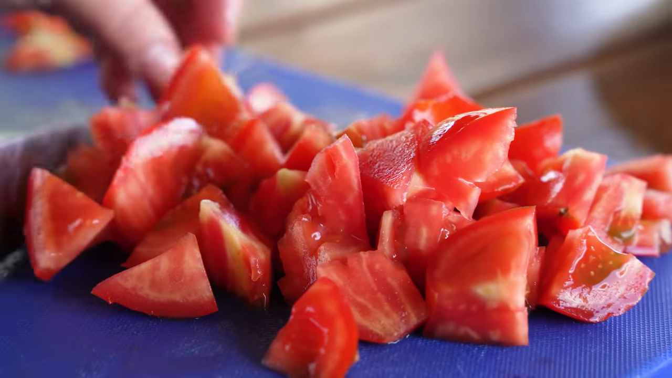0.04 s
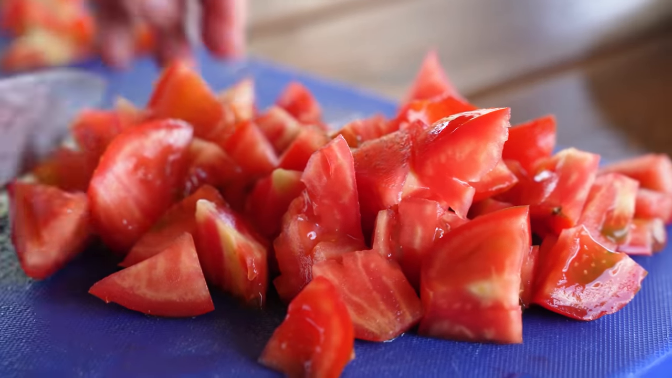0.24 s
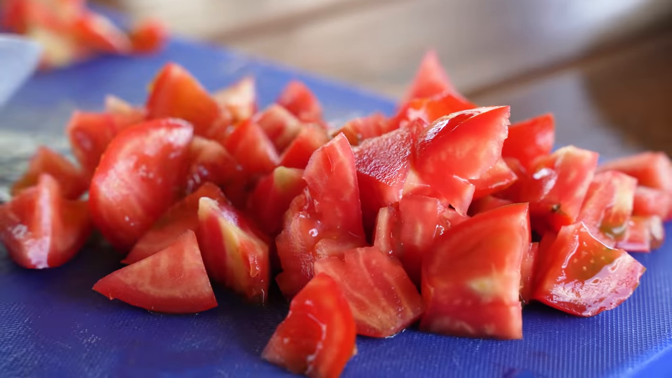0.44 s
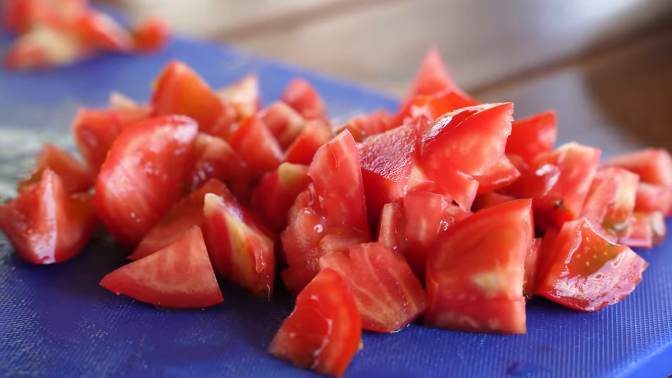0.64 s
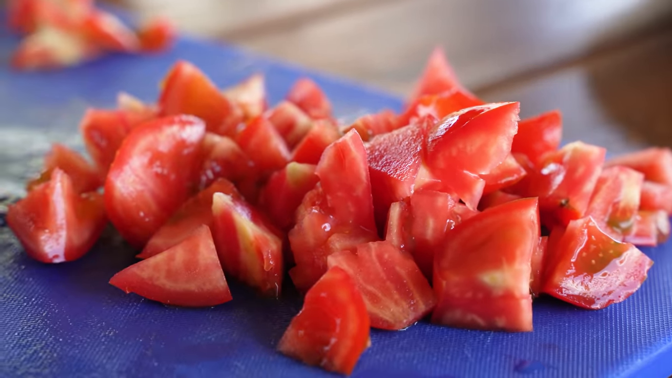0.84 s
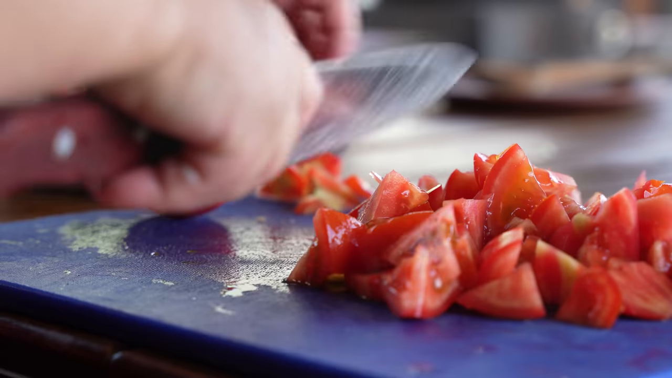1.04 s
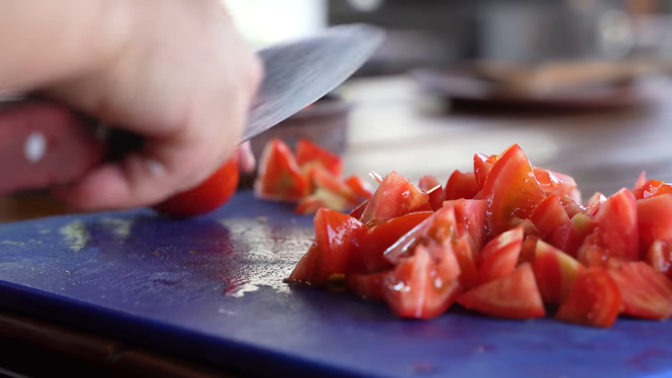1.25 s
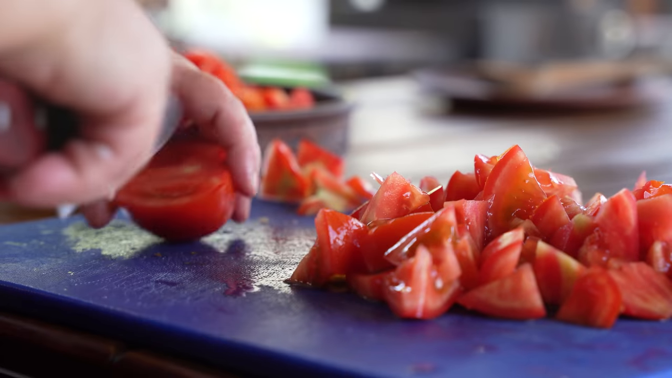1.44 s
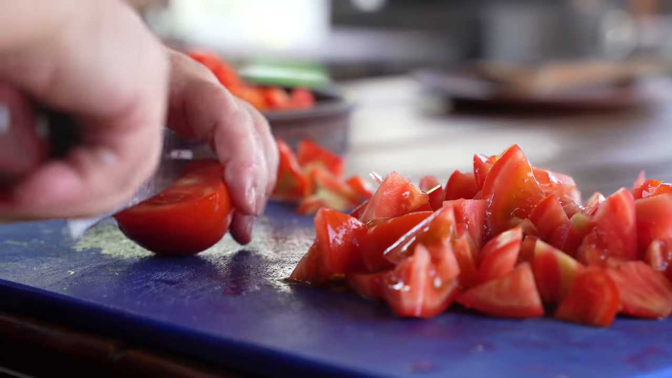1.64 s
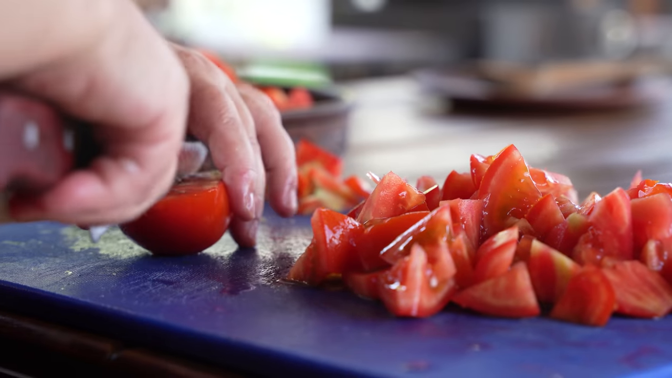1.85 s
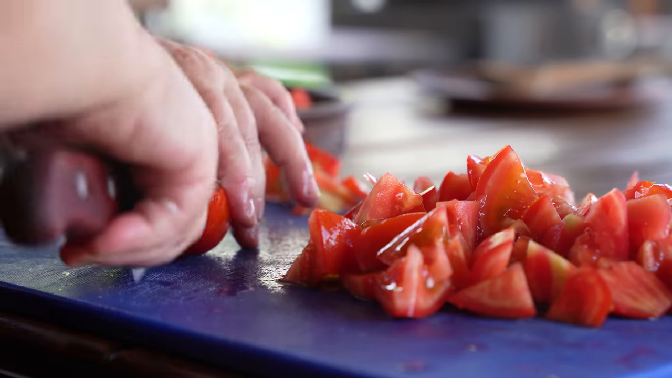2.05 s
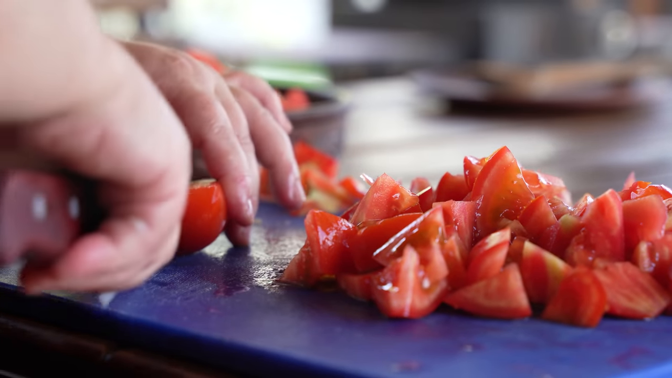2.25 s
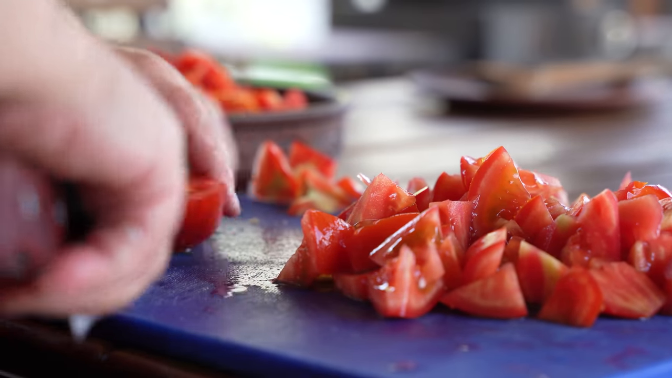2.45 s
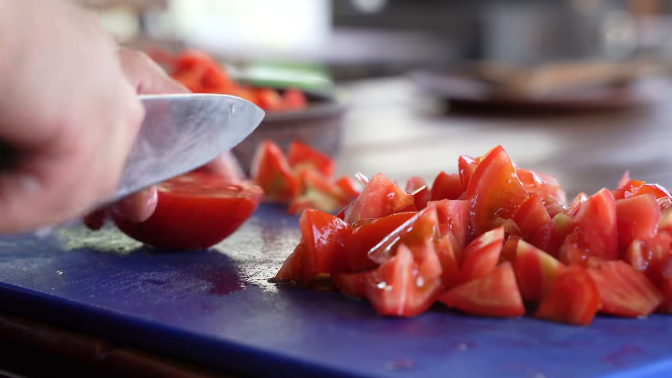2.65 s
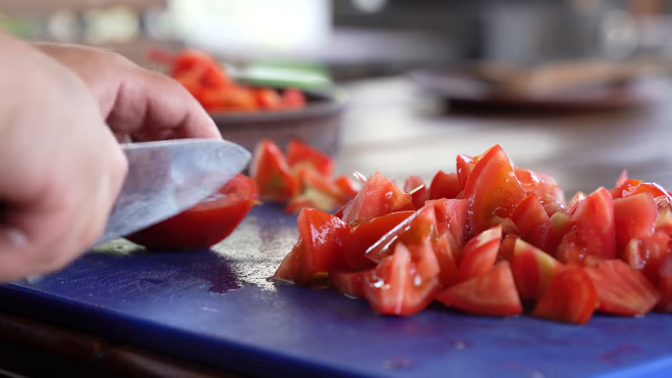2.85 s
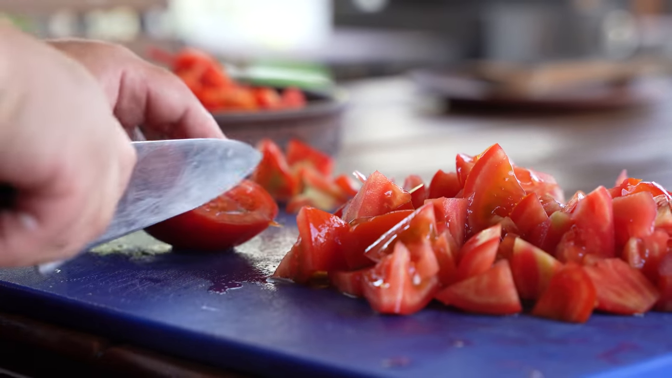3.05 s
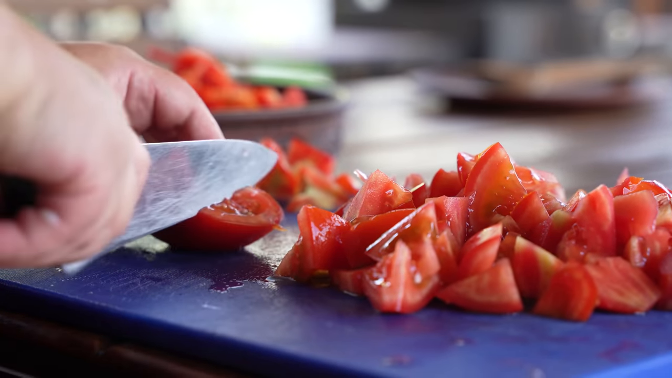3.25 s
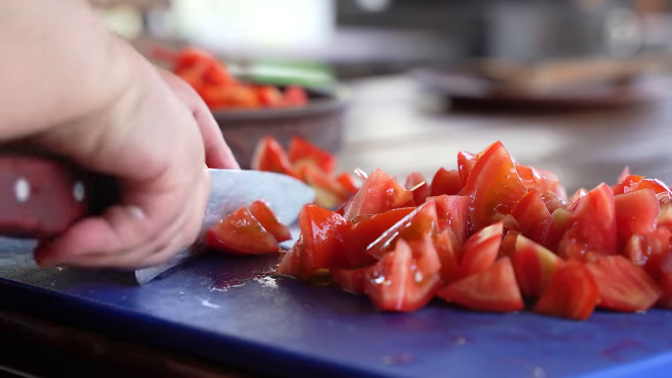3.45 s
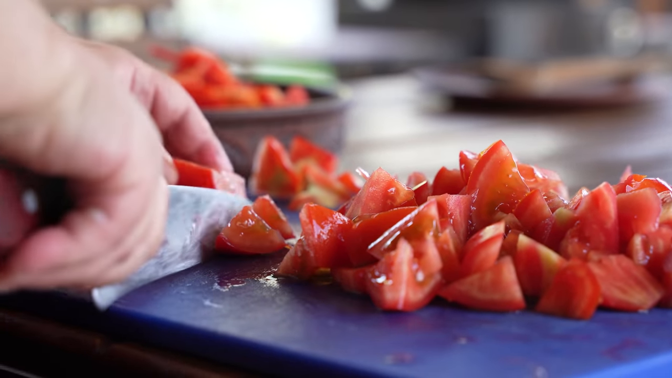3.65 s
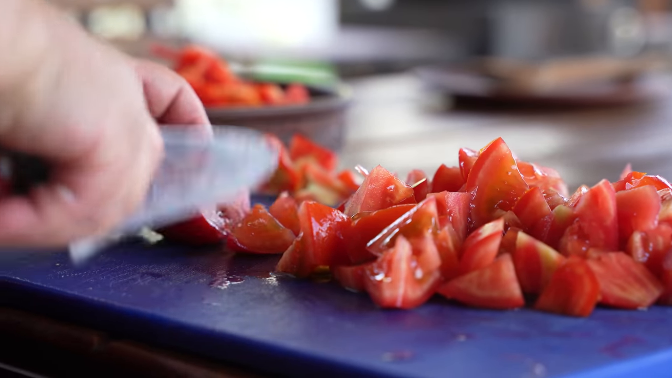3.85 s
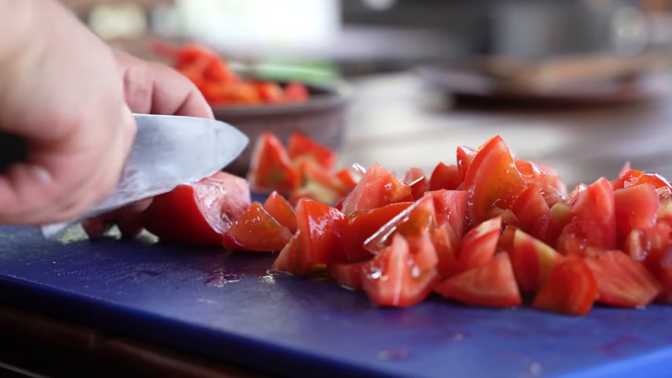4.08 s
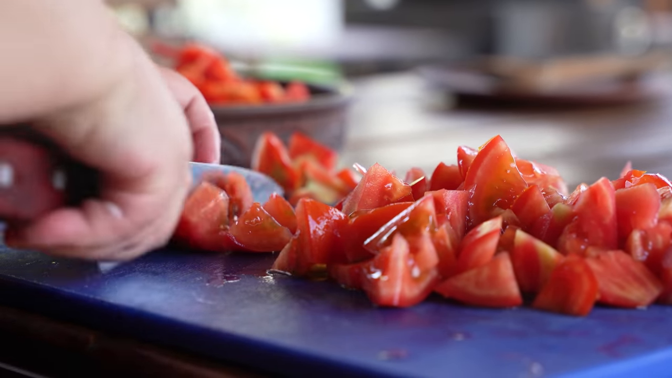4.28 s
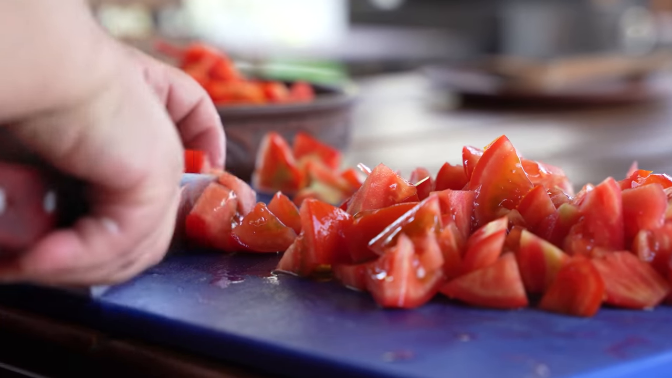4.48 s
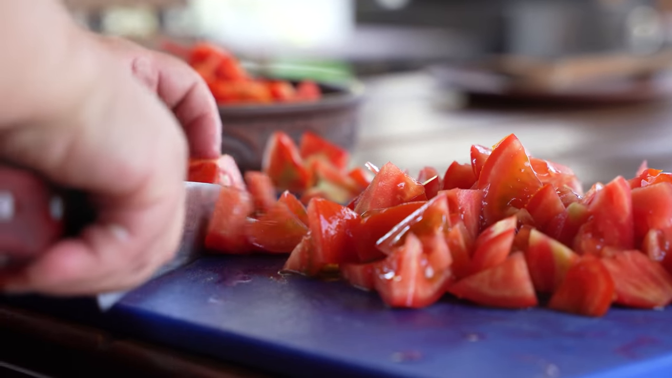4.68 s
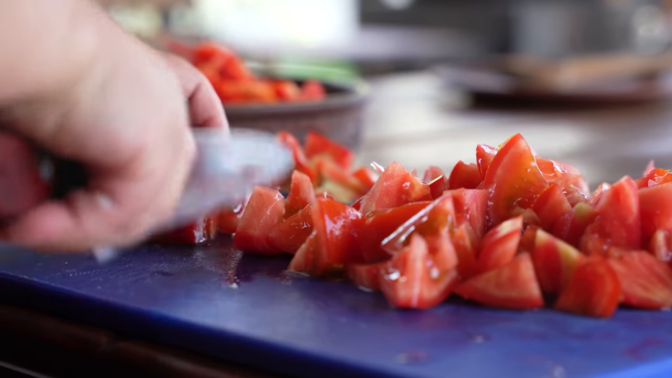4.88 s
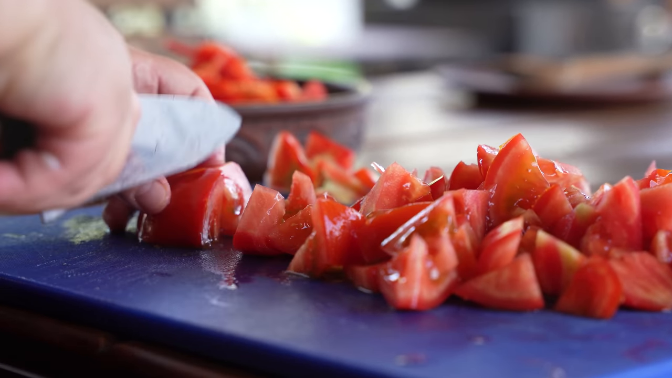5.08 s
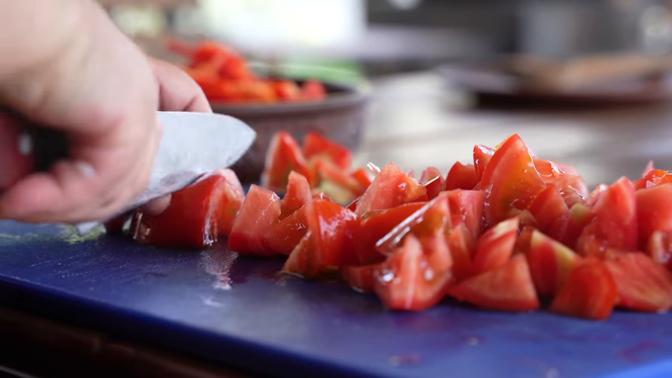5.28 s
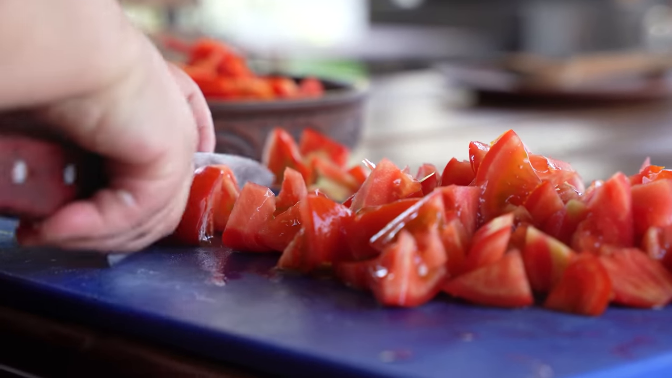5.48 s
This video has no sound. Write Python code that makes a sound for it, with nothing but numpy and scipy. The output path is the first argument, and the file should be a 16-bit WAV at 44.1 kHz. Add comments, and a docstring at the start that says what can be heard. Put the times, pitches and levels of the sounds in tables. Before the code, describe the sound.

A knife rasps through wet flesh and lands on a board with short, dull, woody knocks. An early blow is followed by near quiet; slicing starts around two seconds, then a softer clustered knock, a medium one, a faint stuttering scrape, and a strong final chop. Close mono pickup, small nearby reflections, faint low ambient rush with slight hiss.

```python
"""A chef's knife cuts tomatoes on a plastic board on a wooden table, close to the microphone.
Its edge rasps and fizzes through wet flesh: filtered click trains, with a faint narrow-band singing.
Knocks and judders ring a bank of decaying board modes, with echoes and diffuse noise tails.
Short noise bursts snap, rough gliding tones squeak; a steady rush of shaped noise hums faintly behind."""
import sys
import numpy as np
from scipy import signal
from scipy.fft import rfft, irfft
from scipy.io import wavfile
from scipy.ndimage import uniform_filter1d

SR = 44100
rng = np.random.default_rng(int(sys.argv[2]) if len(sys.argv) > 2 else 0)


def generate_wav(signal):
    """Clip the signal to [-1, 1] and save it as 16-bit WAV at the path in sys.argv[1]."""
    frames = np.transpose(np.atleast_2d(signal))
    scaled = np.clip(frames, -1, 1) * 32767
    pcm = np.round(scaled).astype(np.int16)
    wavfile.write(sys.argv[1], SR, pcm)


N = 243431
TIME = np.arange(N) / SR  # s

# Spectrum of the rush behind, relative: f/Hz, level per Hz/dB
RUSH_SPECTRUM = [(15, -62), (25, -12), (48, -30), (77, -3.5), (113, -11.5), (140, -1.5), (198, -5.5),
                 (221, -4), (340, -1), (537, -6), (945, -0.5), (2420, -15.5), (3930, -18), (5880, -32),
                 (15500, -47.5)]
# Narrow hums and broader bumps (or dips) on that spectrum: f/Hz, width/Hz, boost/dB
RUSH_RESONANCES = [(147.2, 9.6, 7), (197.6, 13.7, 11.5), (330, 15, 5), (980, 270, -1), (3970, 840, 5.5)]
# Moments when the rush hisses more: middle t/s, length/s, extra treble level/dB
HISS_SWELLS = [(.88, 0.45, 4), (1.42, 0.32, 3)]
# Ringing modes of the board on its table, before each blow's pitch factor: f/Hz, level/dB, t60/s
BOARD_MODES = [(89.6, -21, 0.35), (159, -8, 0.079), (232, -9, 0.069), (340.6, 2.5, 0.037),
               (447, 1.5, 0.018), (506, 2.5, 0.041), (576.5, 4, 0.023), (714, -1, 0.037), (782, -8, 0.089),
               (975, -4, 0.031), (1042, 2, 0.039), (1280, -36, .055), (1313, -12.5, 0.042),
               (1746, -11, 0.057), (1846, -9, 0.055), (1944, -8.5, 0.027), (2200, -3, 0.013),
               (2650, -9, 0.02), (2947, -6, 0.019), (3130, -6, 0.0067), (3650, 3, 0.0088)]
# Blows on the board: t/s, level/dB, contact cut-off f/Hz, pitch factor,
# f/Hz favoured by the spot struck, its boost/dB, tail level/dB before the tail's filters, tail t60/s
BLOWS = [(.128, -26.5, 1260, 0.98, 800, 4, -5.5, 0.38), (0.1326, -36, 457, 1.01, 339, 17.5, -10, 0.3),
         (.933, -56.5, 259, 1.1, 181, 24, 5, 0.82), (2.073, -28, 1610, 0.94, 1090, 3, 0, 0.44),
         (3.454, -41.5, 735, 1.01, 250, 10, -5, 0.35), (3.466, -48.5, 2300, 0.94, 1900, 5, 1.5, 0.44),
         (3.4727, -39, 240, 0.99, 106, 19, -2.5, 0.31), (3.4862, -43, 300, 1.49, 230, 12, -7, .2),
         (3.507, -48.5, 320, 1.21, 271, 12, 1, 0.28), (4.344, -35, 1150, 0.98, 457, 5, -3.5, 0.43),
         (4.348, -41, 130, 1.08, 85, 16, -13, 0.5), (4.7661, -47.5, 260, 1, 182, 14.5, -10, .3),
         (4.8045, -44, 420, 1.16, 200, 1, -15, .3), (5.4655, -26.5, 1820, 1.02, 445, 3, 0, 0.46)]
# First echoes from the table top, bowl and hand: delay/s, level/dB
ECHOES = [(.0046, -6.5), (.0081, -12.5), (0.0113, -16)]
# Small snaps of skin and juice: t/s, peak level/dB, centre f/Hz
SNAPS = [(0.1287, -50, 8600), (.209, -61, 12000), (2.339, -46, 6050), (2.5268, -51, 6000),
         (3.468, -48, 7000), (3.634, -46, 8000), (3.6475, -53, 9900), (4.611, -51, 9900),
         (5.305, -47, 3600), (5.332, -37, 8600), (5.372, -43.5, 3200)]
# Squeaks of the wet blade: middle t/s, length/s, f/Hz at the middle, glide/(octaves per s), level/dB
SQUEAKS = [(0.186, .015, 4110, -4.5, -47.5), (0.211, .012, 3950, -4.5, -49), (0.227, 0.03, 3480, -2, -52),
           (2.49, .19, 12000, -.03, -75), (5.445, .06, 3940, 1, -49)]
# Spectra of the blade's rasp and the juice's fizz, relative: f/Hz, level per Hz/dB
RASP_SPECTRUM = [(60, -51), (350, 7.5), (1000, -2), (1900, 3), (2600, 0.5), (3400, 2.5), (4050, 0),
                 (4500, -12.5), (6000, -16.5), (12000, -27.5)]
FIZZ_SPECTRUM = [(2000, -47), (4500, 6), (6500, 1.5), (9000, 3), (12500, -3.5), (15500, -2.5)]
# Pushes down through a tomato, faster and faster: t/s at the fastest, time of the last 10 dB of swell/s,
# rasp level/dB, wet fizz level/dB, singing f/Hz
CUTS = [(2.068, 0.0243, -49, -59.5, 3450), (3.451, 0.086, -50, -60.5, 3947), (4.338, 0.1, -50, -62.5, 3800),
        (5.462, 0.026, -44, -60.5, 3950)]
# Slides along flesh and board: middle t/s, length/s, rasp level/dB, wet fizz level/dB,
# singing f/Hz at the middle, its glide/(octaves per s)
SLIDES = [(1.93, .36, -60.5, -81, 3100, 0.5), (2.161, 0.182, -64, -78, 3900, 0),
          (2.361, 0.296, -51, -70, 3920, 0), (3.132, 0.243, -63.5, -95, 3950, 0),
          (3.674, .2, -50, -69, 3870, 0), (4.558, .2, -52.5, -71, 2752, -3),
          (4.769, .12, -51.5, -72, 3750, 0), (5.334, .2, -57.5, -73, 3900, 0)]
# Judders of the edge along the board: t/s at full grip, length held/s, level/dB
JUDDERS = [(4.746, 0.029, -42.5), (4.802, 0.017, -42)]

RUSH_DB = -53  # level the rush settles towards, before the slow fade
RUSH_START_DB, SETTLE_S = 3, 0.83  # extra level at the start and its time constant
FADE_DB_PER_S = 0.32  # slow fade of the rush throughout
HISS_DB = 3.5  # steady lift of the rush's treble
STOP_S = 0.04  # the board stops the blade: time to fall by 10 dB
JUICE_LEAD_S = 0.017  # the juice bursts most just before the blade is through
FIZZ_POWER = 0.79  # in a slide the rasp follows the speed, the fizz this power of it
GRIP_S, LET_GO_S = 0.014, 0.015  # time constants with which a judder builds and dies
MIC_LOW_HZ = 73.6  # the microphone's bass roll-off, applied to the thuds
EDGE_HZ = 15900  # the recorder's upper limit


def amp(db):
    """Decibels to gain."""
    return 10 ** (np.asarray(db) / 20)


def unit(x):
    """Scales to rms 1."""
    return x / np.sqrt(np.mean(x ** 2) + 1e-20)


def add(mix, s, sound):
    """Mixes a sound in at time s."""
    part = mix[max(round(s * SR), 0):][:len(sound)]
    part += sound[:len(part)]


def cut(x, hz, kind, order=2):
    """Causal low-, high- or band-pass."""
    return signal.sosfilt(signal.butter(order, hz, kind, fs=SR, output="sos"), x)


def colour(x, spectrum, peaks=()):
    """Gives x a smooth spectrum with optional resonant bumps, at rms 1."""
    hz = np.fft.rfftfreq(len(x), 1 / SR)
    points, levels = np.transpose(spectrum)
    db = np.interp(np.log(hz + 1), np.log(points), levels)
    for centre, width, boost in peaks:
        db = db + boost / (1 + (2 * (hz - centre) / width) ** 2)
    return unit(irfft(rfft(x) * amp(db), len(x)))


def arch(t, middle, length):
    """A smooth rise and fall with top 1, 10 dB down at the ends of its length."""
    return amp(-10 * np.minimum((2 * (t - middle) / length) ** 2, 20))


def background(treble_hz=5000):
    """A steady rush with a few humming resonances, slowly dying down while its hiss swells twice."""
    level_db = RUSH_DB + RUSH_START_DB * np.exp(-TIME / SETTLE_S) - FADE_DB_PER_S * TIME
    treble_db = HISS_DB + sum(db * arch(TIME, s, length) for s, length, db in HISS_SWELLS)
    rush = colour(rng.standard_normal(N), RUSH_SPECTRUM, RUSH_RESONANCES)
    # filtered forwards and backwards, so the treble stays in phase with the rush
    treble = cut(rush, treble_hz, "high")
    treble = cut(treble[::-1], treble_hz, "high")[::-1]
    return amp(level_db) * (rush + (amp(treble_db) - 1) * treble)


def board(contact_hz, stretch, spot_hz, spot_db, spot_q=3.45, top_hz=4200, travel_s=0.0015):
    """The board's answer to one push: soft contact dulls it, the spot struck favours some modes."""
    t = np.arange(SR // 2) / SR
    ring = np.zeros(len(t))
    for hz, db, t60 in BOARD_MODES:
        ring -= amp(db - 60 * t / t60) * np.cos(2 * np.pi * hz * stretch * t)
    spot = signal.lfilter(*signal.iirpeak(spot_hz, spot_q, SR), ring)
    ring = ring + (amp(spot_db) - 1) * spot
    # bending waves disperse: an all-pass brings the bass a little after the treble
    pole = np.exp(-2 / (travel_s * SR))
    ring = signal.lfilter([pole, -1], [1, -pole], ring)
    ring = cut(ring, contact_hz, "low")
    return cut(ring, top_hz, "low", order=8)  # plastic soaks up the treble


def surroundings(x, t60=0.51, delay=0.006, build=0.0028, low_hz=210, dull_hz=1450):
    """Dense reflections that build up and die away (times in s), with little bass or treble."""
    t = np.arange(SR // 2) / SR
    tail = rng.standard_normal(len(t)) * np.exp(-t / 0.05)
    for _ in range(3):  # a diffuse tail carries all pitches about equally
        spectrum = rfft(tail)
        power = uniform_filter1d(abs(spectrum) ** 2, size=15)
        tail = irfft(spectrum / np.sqrt(power), len(t))
    # even out the loudness over time, then shape it
    tail = tail / np.sqrt(uniform_filter1d(tail ** 2, size=800) + 1e-14)
    tail = tail * np.exp(-np.log(1000) * t / t60) * np.clip((t - delay) / build, 0, 1)
    tail = tail / np.linalg.norm(tail)
    tail = cut(tail, dull_hz, "low", order=3)
    tail = cut(tail, low_hz, "high", order=1)
    return signal.fftconvolve(x, tail)[:len(x)]


def knocks(body_db=-7):
    """The blade lands on the board, whose modes ring and reflect nearby."""
    out = np.zeros(N)
    for s, db, contact_hz, stretch, spot_hz, spot_db, tail_db, t60 in BLOWS:
        knock = amp(db) * board(contact_hz, stretch, spot_hz, spot_db)
        add(out, s, knock + amp(tail_db) * surroundings(knock, t60))
        # waves scatter inside the board for the first few milliseconds
        body = surroundings(knock, t60=0.032, delay=0.00073, build=0.0037, low_hz=650, dull_hz=4000)
        add(out, s, amp(body_db) * body)
        for delay, echo_db in ECHOES:
            add(out, s + delay, amp(echo_db) * knock)
    return out


def snaps(decay_s=0.00059, band_ratio=1.26):
    """Millisecond cracks of skin and juice: decaying noise through a band under an octave wide."""
    t = np.arange(500) / SR
    out = np.zeros(N)
    for s, db, hz in SNAPS:
        burst = rng.standard_normal(len(t)) * np.exp(-t / decay_s)
        crack = cut(burst, [hz / band_ratio, hz * band_ratio], "band")
        add(out, s, amp(db) * crack / abs(crack).max())
    return out


def squeak(waver=0.01, rough=0.52):
    """Rough whistles of steel slipping on the wet board, gliding in pitch, mostly downwards."""
    out = np.zeros(N)
    for s, length, hz, glide, db in SQUEAKS:
        t = np.arange(-length, length, 1 / SR)
        wobble = unit(cut(rng.standard_normal(len(t)), 390, "low"))
        grit = unit(cut(rng.standard_normal(len(t)), 390, "low"))
        pitch = hz * 2 ** (glide * t) * (1 + waver * wobble)
        whistle = np.sin(2 * np.pi * np.cumsum(pitch) / SR)
        add(out, s - length, amp(db) * arch(t, 0, length) * (1 + rough * grit) * whistle)
    return out


def grains(per_s, spread_db):
    """A random train of clicks of uneven size."""
    size = amp(spread_db * np.minimum(rng.exponential(1, N), 4))
    return size * rng.standard_normal(N) * (rng.random(N) < per_s / SR)


def patchy(x, patch_db):
    """Lets narrow bands flare and fade, as the point of contact keeps shifting."""
    z = signal.stft(x, nperseg=512, noverlap=384)[2]
    patches = uniform_filter1d(rng.standard_normal(z.shape), size=4, axis=0)  # across pitch
    patches = uniform_filter1d(patches, size=10, axis=1)  # across time
    flared = signal.istft(z * amp(patch_db * unit(patches)), nperseg=512, noverlap=384)[1]
    return unit(flared[:N])


def swell(t, top_s, rise_s):
    """Grows by 10 dB in each rise_s up to 1 at top_s, then is stopped short."""
    return amp(-10 * np.minimum(np.maximum((top_s - t) / rise_s, (t - top_s) / STOP_S), 20))


def blade_motion():
    """Rasp gain, fizz gain and singing pitch that follow the blade's speed in all its cuts and slides."""
    strokes = []
    for s, rise_s, rasp_db, fizz_db, hz in CUTS:
        speed = swell(TIME, s, rise_s)
        juice = swell(TIME, s - JUICE_LEAD_S, rise_s)
        strokes.append((amp(rasp_db) * speed, amp(fizz_db) * juice, np.full(N, hz)))
    for s, length, rasp_db, fizz_db, hz, glide in SLIDES:
        speed = arch(TIME, s, length)
        pitch = hz * 2 ** (glide * np.clip(TIME - s, -length, length))
        strokes.append((amp(rasp_db) * speed, amp(fizz_db) * speed ** FIZZ_POWER, pitch))
    rasp, fizz, pitch = (np.array(part) for part in zip(*strokes))
    # strokes add in power; the strongest rasp leads the pitch
    sing_hz = np.average(pitch, axis=0, weights=rasp ** 2)
    return np.linalg.norm(rasp, axis=0), np.linalg.norm(fizz, axis=0), sing_hz


def slicing(sing_db=-8, sing_width_hz=100, flutter_db=0.9):
    """Tiny slips of the blade rasp and faintly sing; bursting wet cells fizz."""
    rasp_gain, fizz_gain, sing_hz = blade_motion()
    rasp = patchy(colour(grains(per_s=5000, spread_db=0.5), RASP_SPECTRUM), patch_db=2.5)
    fizz = patchy(colour(grains(per_s=8900, spread_db=2.5), FIZZ_SPECTRUM), patch_db=3.0)
    # slow noise on a tone makes a narrow band that follows the pitch
    slow_noise = cut(rng.standard_normal(N), sing_width_hz, "low")
    sing = unit(slow_noise * np.sin(2 * np.pi * np.cumsum(sing_hz) / SR))
    # the flesh resists unevenly
    flutter = amp(flutter_db * unit(cut(rng.standard_normal(N), 63, "low")))
    return flutter * (rasp_gain * (rasp + amp(sing_db) * sing) + fizz_gain * fizz)


def judder(slips_hz=190, uneven=0.48, tail_db=-8):
    """The pressed edge sticks and slips, each slip a soft push on the board."""
    forces = []
    for s, length, db in JUDDERS:
        away = np.maximum((s - TIME) / GRIP_S, (TIME - s - length) / LET_GO_S)
        forces.append(amp(db) * np.exp(-np.clip(away, 0, 20)))
    force = np.max(forces, axis=0)
    rate = slips_hz * np.exp(uneven * unit(uniform_filter1d(rng.standard_normal(N), size=250)))
    slips = np.diff(np.floor(np.cumsum(rate) / SR), prepend=0)  # one click per whole cycle
    push = board(contact_hz=2000, stretch=0.96, spot_hz=298, spot_db=14)
    # scaled so that a steady run of slips has an rms near 1
    push = push / np.linalg.norm(push) * np.sqrt(SR / slips_hz)
    out = signal.fftconvolve(slips * force, push)[:N]
    return out + amp(tail_db) * surroundings(out)


def scene():
    """All sources at one microphone, which picks up little of the board's deepest bass."""
    thuds = cut(knocks() + judder(), MIC_LOW_HZ, "high", order=6)
    return (background() + thuds + snaps() + squeak() + slicing())[None]


def record(dry):
    """The recorder's band limit: a steep, linear-phase low-pass."""
    low_pass = signal.firwin(511, EDGE_HZ, window=("kaiser", 9), fs=SR)
    return signal.oaconvolve(dry, low_pass[None], "same")


dry = scene()
out = record(dry)
generate_wav(out)
```